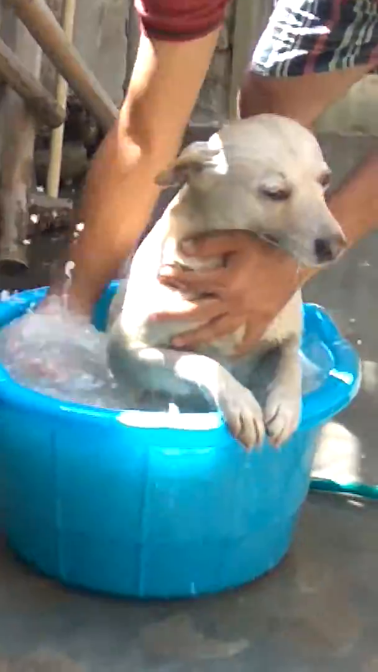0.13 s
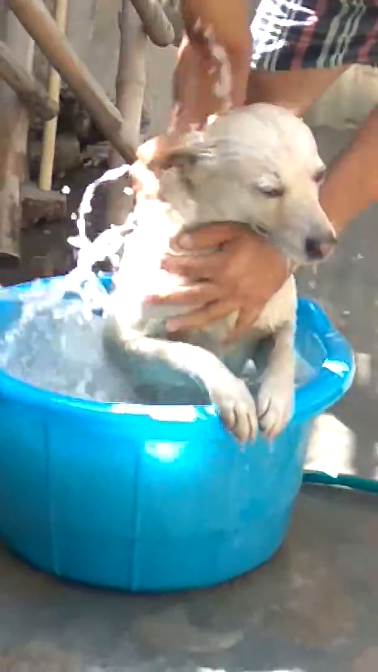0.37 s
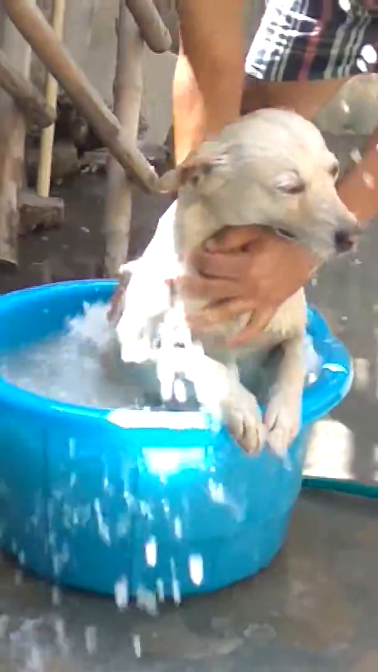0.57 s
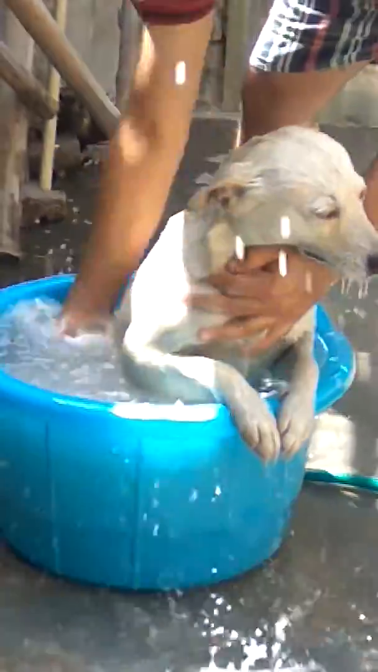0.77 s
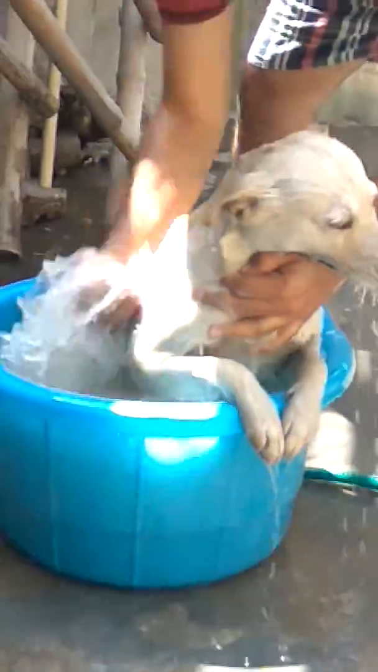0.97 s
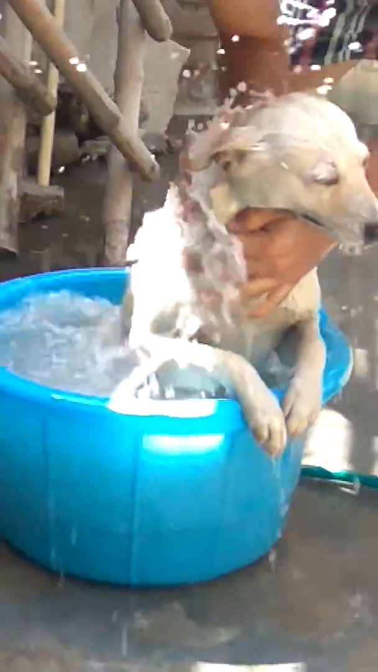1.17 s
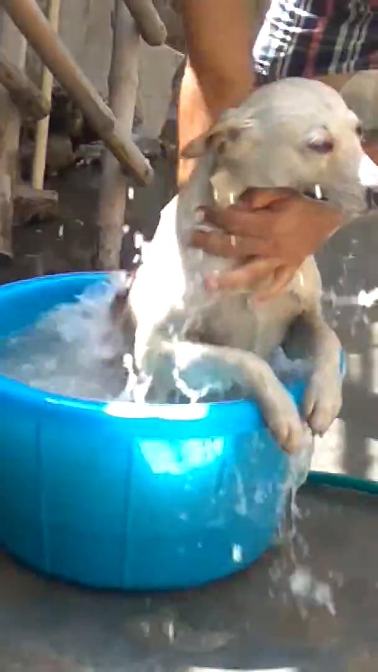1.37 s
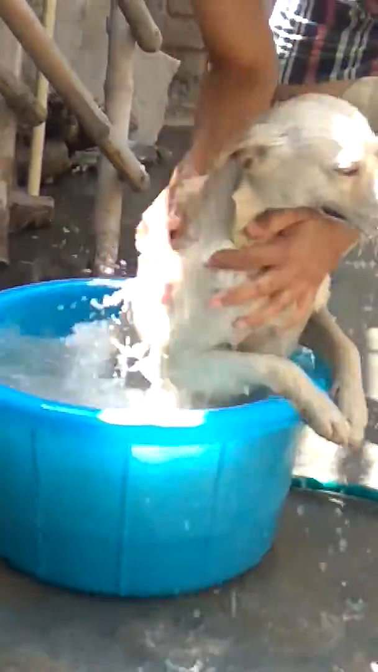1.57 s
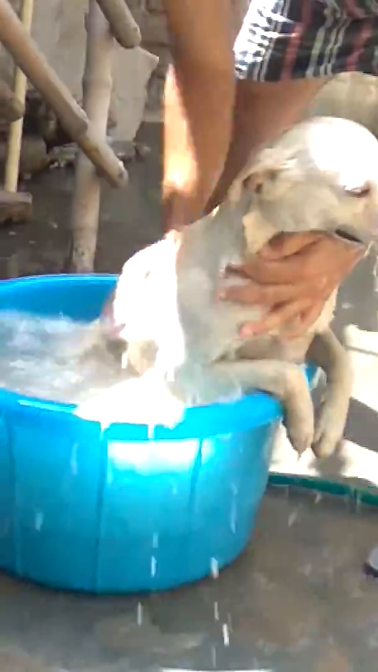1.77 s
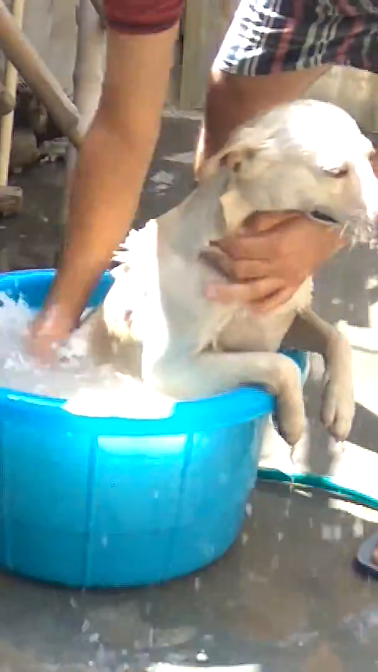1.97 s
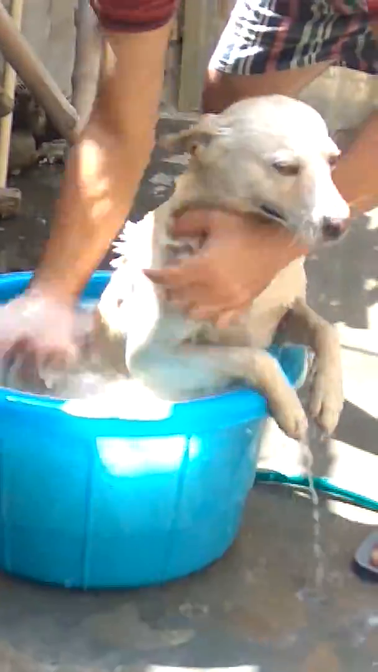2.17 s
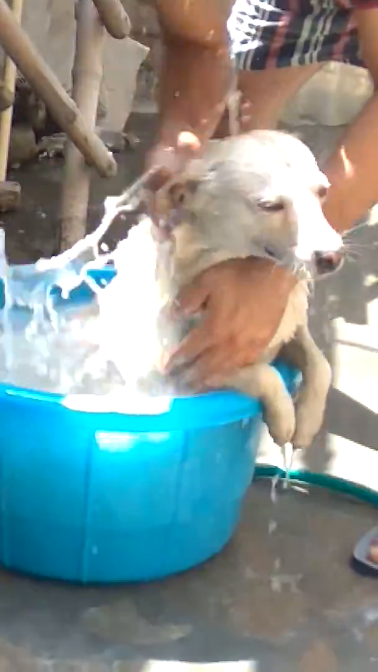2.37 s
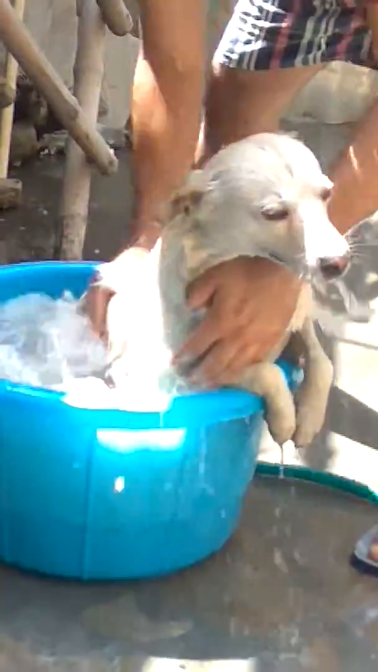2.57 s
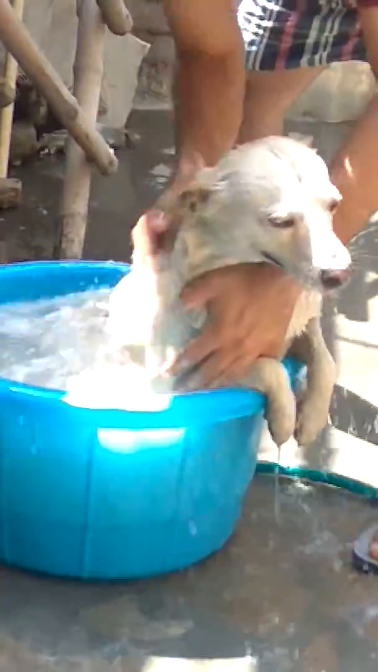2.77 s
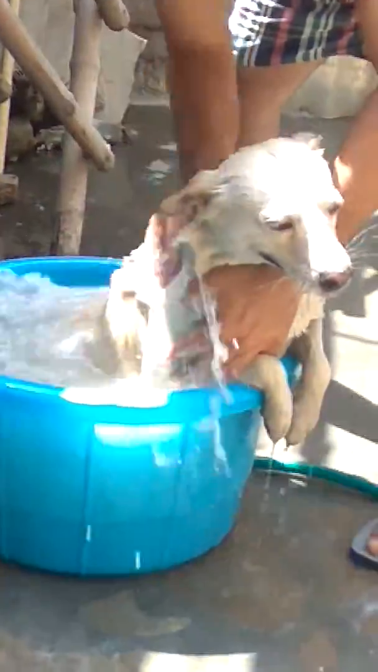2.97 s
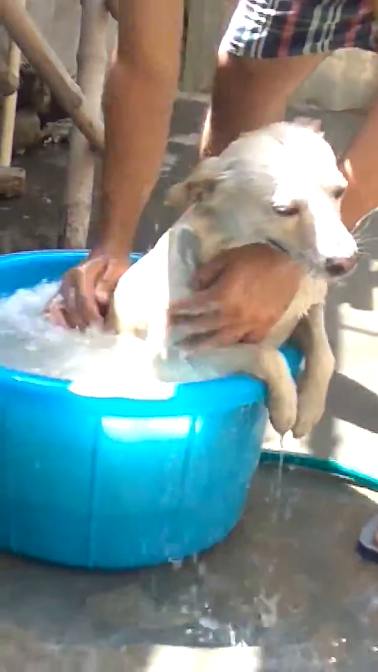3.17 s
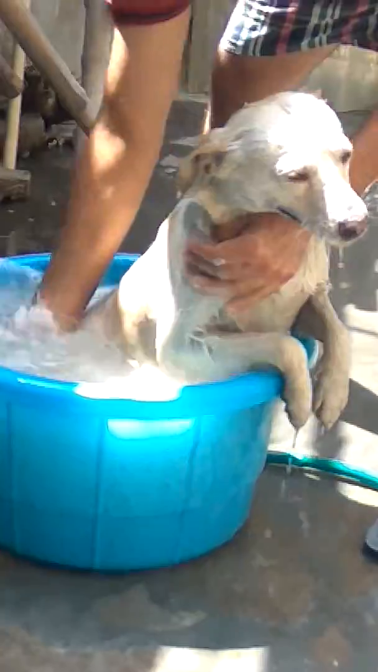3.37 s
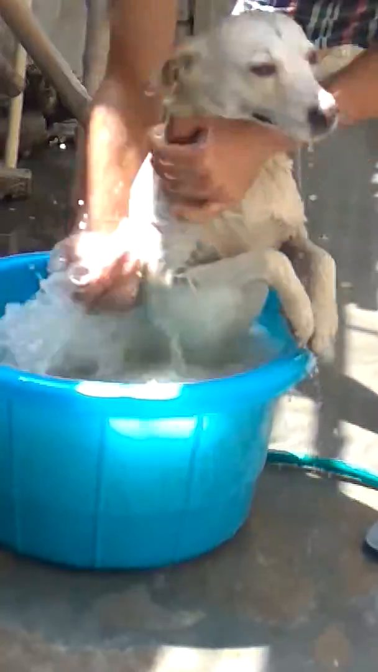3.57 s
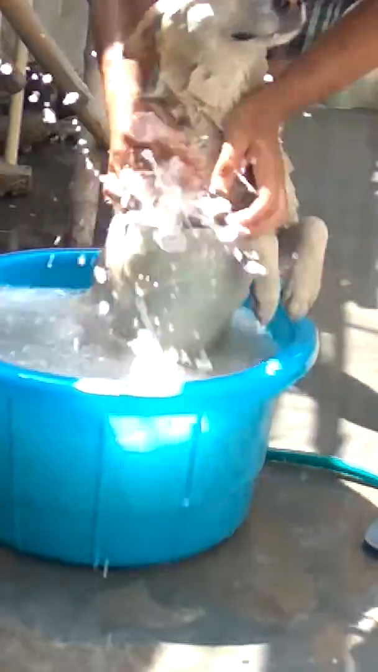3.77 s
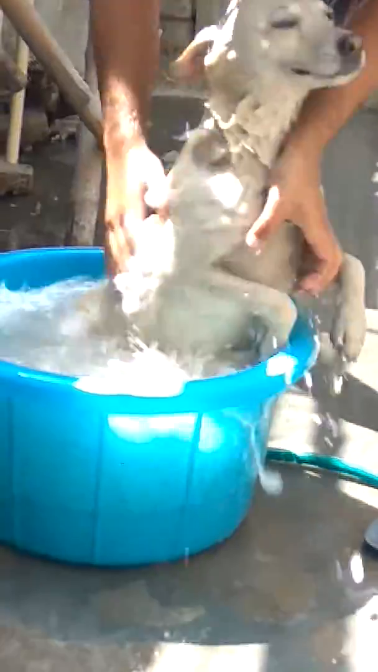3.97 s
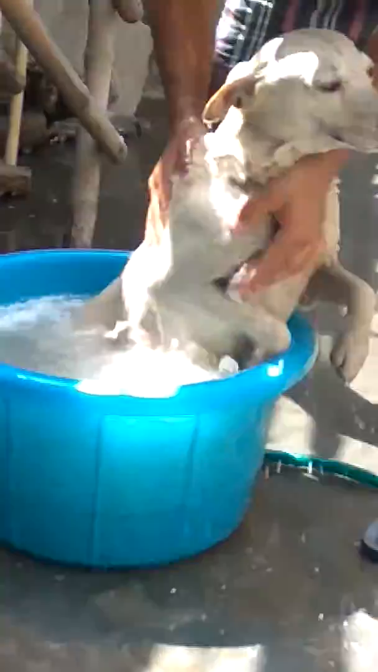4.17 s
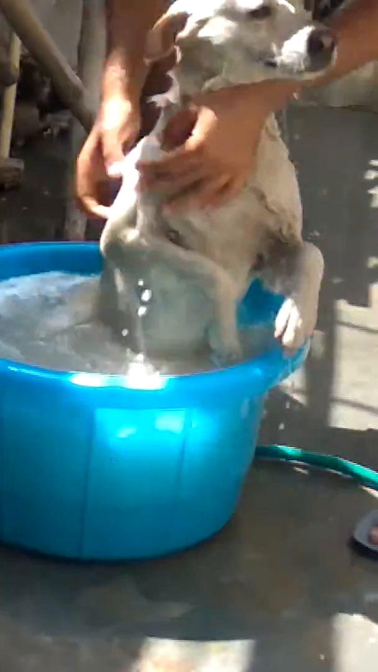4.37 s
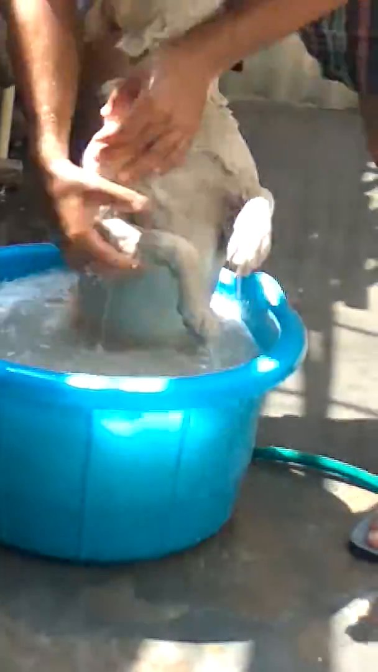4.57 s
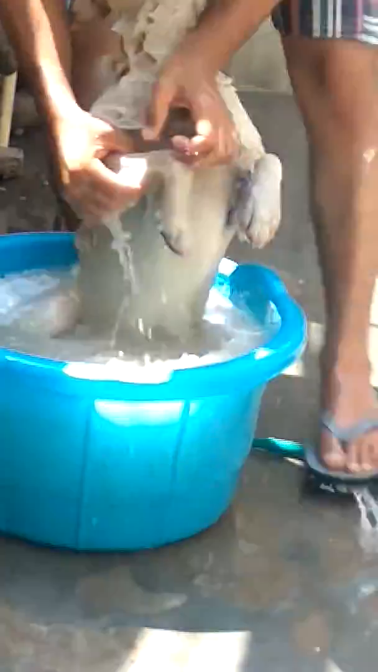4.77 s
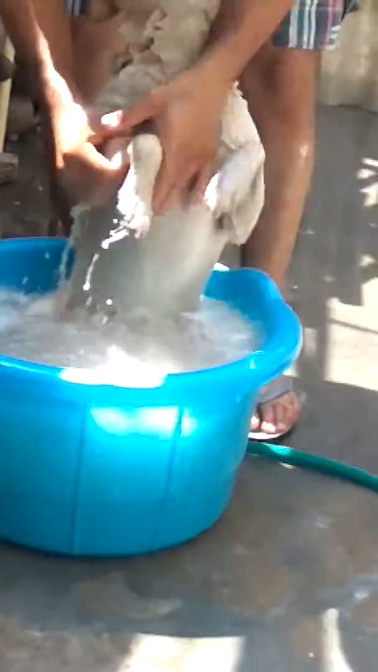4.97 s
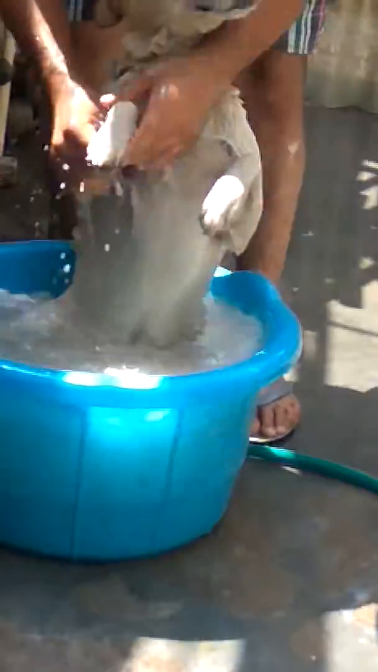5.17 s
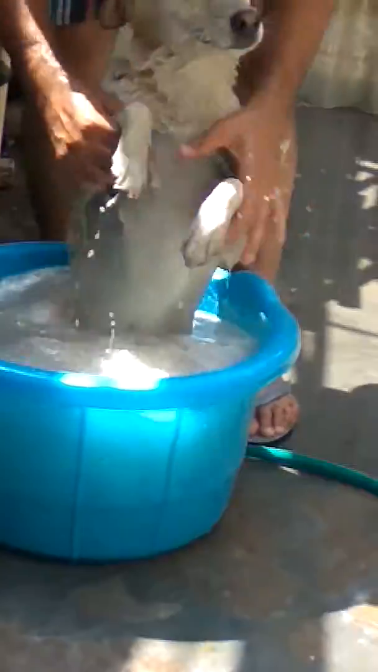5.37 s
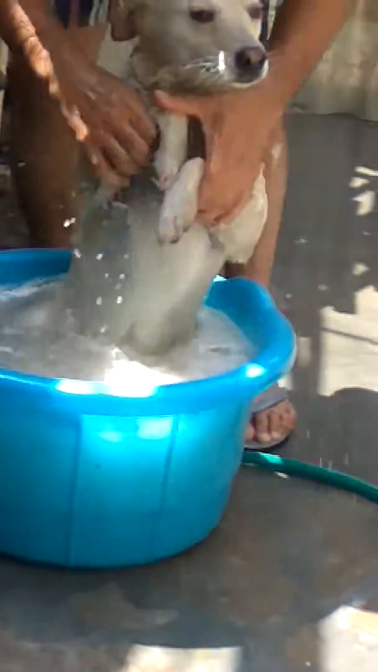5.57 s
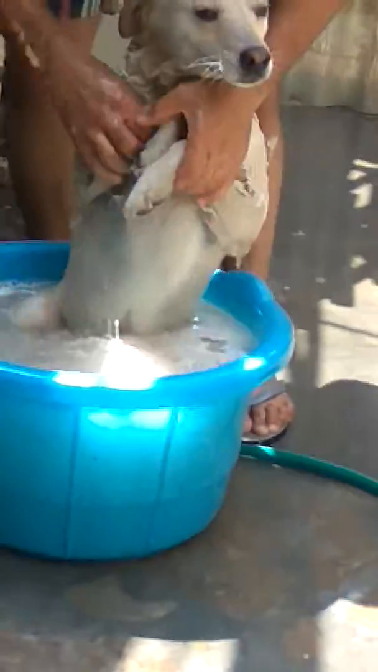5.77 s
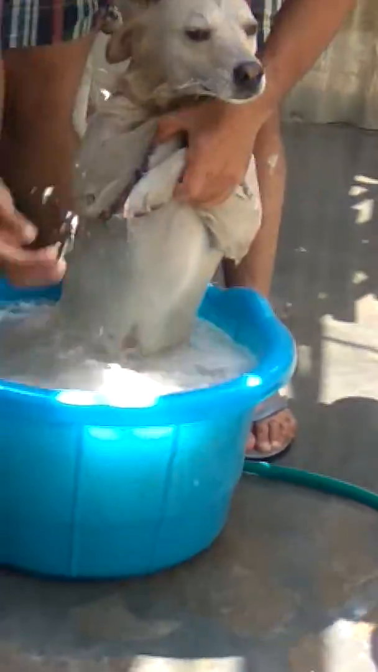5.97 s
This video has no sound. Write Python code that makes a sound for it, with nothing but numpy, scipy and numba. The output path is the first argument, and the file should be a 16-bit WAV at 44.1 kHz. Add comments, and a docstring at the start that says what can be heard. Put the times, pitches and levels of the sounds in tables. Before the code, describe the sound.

A hand briskly scoops water over a dog in a plastic tub outdoors, with gulping sloshes, slapping splashes, pattering drips, and a low tub bump near the end.

```python
"""A small walled yard, where a hand scoops water over a dog standing in a plastic tub.
Strokes and gulps are swarms of ringing bubbles; slaps, pattering sheets and runoff are clouds of tiny droplets.
Fat blobs smack as brief rings. The tub's walls drum softly in their modes and its plastic groans in bending tones;
near the end it is bumped and booms, rasping on the concrete. Far off, birds coo faintly as wavering sines.
Filtered noise makes the outdoor air, and short noise tails make the close echoes and those of the yard."""
import sys
import numpy as np
from scipy import signal
from scipy.fft import rfft, irfft
from scipy.io import wavfile
from scipy.ndimage import uniform_filter1d
from numba import njit

SR = 44100
rng = np.random.default_rng(int(sys.argv[2]) if len(sys.argv) > 2 else 0)


def int16_out(signal):
    """Quantize to a 16-bit WAV file."""
    q = np.round(np.clip(np.atleast_2d(signal).T, -1, 1) * 32767)
    wavfile.write(sys.argv[1], SR, q.astype(np.int16))


N = 265923
TIME = np.arange(N) / SR  # seconds
PORT_LAG_S = 0.00022  # typical lag by which the tub's sound reaches the right port of the microphone first
BUBBLE_ATTACK_CYCLES = 1.26  # a bubble takes this long to pinch off


def undb(db):
    """Decibels to gain."""
    return 10 ** (np.asarray(db) / 20)


def unit(x):
    """Scale to rms 1."""
    return x / np.sqrt(np.mean(x ** 2) + 1e-20)


def curves(table):
    """The columns of a control table, interpolated over time sample by sample."""
    s, *columns = np.transpose(table)
    return [np.interp(TIME, s, column) for column in columns]


def colour(x, points):
    """Filter by a spectrum of (Hz, dB) points, joined over log frequency."""
    hz, db = np.transpose(points)
    f = np.fft.rfftfreq(2 * N, 1 / SR) + 1
    gain = undb(np.interp(np.log(f), np.log(hz), db))
    return irfft(rfft(x, 2 * N) * gain)[..., :N]


def band(x, hz, q):
    """A resonance round hz, at rms 1."""
    b, a = signal.iirpeak(hz, max(q, 3 * hz / SR), fs=SR)
    return unit(signal.lfilter(b, a, x))


def sides(pan_db):
    """Left and right gains for a left minus right difference in dB."""
    return undb(np.array([[pan_db], [-pan_db]]) / 2)


def noise(width):
    """Stereo noise whose channels differ by width."""
    mid, side = rng.standard_normal((2, N))
    return np.array([mid + width * side, mid - width * side])


def wander(rate):
    """A random drift of spread 1, smoothed twice over 1 / rate seconds."""
    k = int(SR / rate)
    once = uniform_filter1d(rng.standard_normal(N), k, mode="wrap")
    return unit(uniform_filter1d(once, k, mode="wrap"))


def surges(table, rise, fade):
    """The power of each (start, length, dB) event: it builds up over the share rise of its length, holds and fades."""
    def shape(t, length):
        build = np.clip(t / max(rise * length, .002), 0, 1)
        return build * np.exp(-np.clip((t - length) / fade, 0, 20))
    return np.array([(undb(db) * shape(TIME - start, length)) ** 2 for start, length, db, *_ in table])


def flow(table, rise, fade, rest_db, rest_tone):
    """Gain and tone (last column) of surges over a resting flow; the tone is averaged by power."""
    power, rest = surges(table, rise, fade), undb(rest_db) ** 2
    total = power.sum(axis=0) + rest
    tone = (np.array(table)[:, -1] @ power + rest * rest_tone) / total
    return np.sqrt(total), tone


@njit
def rings(start, hz, t60, size, glide, attack_cycles):
    """Sines that swell for a few cycles and fade, each rising in pitch by the share glide over its life."""
    out = np.zeros(N)
    for k in range(len(start)):
        first = max(int(start[k] * SR) + 1, 0)
        last = min(int((start[k] + t60[k]) * SR), N)
        for i in range(first, last):
            t = i / SR - start[k]
            age = t / t60[k]
            onset = min(t * hz[k] / attack_cycles, 1.)
            tone = np.sin(2 * np.pi * hz[k] * t * (1 + glide[k] * age / 2))
            out[i] += size[k] * onset * np.exp(-6.9 * age) * tone
    return out


def bubbles(s, hz, t60, size, pan_db, glide, scatter_s=.00006):
    """Bubbles spread over the tub, each with its own lag between the ports; they sharpen as they near the surface."""
    lag = PORT_LAG_S * np.clip(hz / 1500, 0, 1) + scatter_s * rng.standard_normal(len(s))
    rise = glide * rng.uniform(0, 2.07, len(s))

    def port(side):
        return rings(s + side * lag / 2, hz, t60, size * undb(side * pan_db / 2), rise, BUBBLE_ATTACK_CYCLES)
    return np.array([port(1), port(-1)])


def swarm(pitch, count, cycles, spread_db, glide):
    """Countless bubbles at random moments, their levels spread exponentially; pitch(s) draws their notes."""
    s = rng.uniform(0, N / SR, count)
    hz = np.clip(pitch(s), 100, 11000)
    life = cycles * np.exp(0.21 * rng.standard_normal(count)) / hz
    size = undb(spread_db * np.minimum(rng.exponential(size=count), 3)) * hz ** .5
    return unit(bubbles(s, hz, life, size, 3 * rng.standard_normal(count), glide))


def droplets(count, cycles, spread_db):
    """The crackle of bursting droplets: short rings pitched evenly from 577 to 8150 Hz."""
    return swarm(lambda s: rng.uniform(577, 8150, len(s)), count, cycles, spread_db, glide=0.043)


def background(waver=0.0154):
    """Thin outdoor air as coloured noise, and soft calls of distant birds as sines with wavering pitch."""
    # Spectrum of the air. Each row: frequency in Hz, level in dB.
    air = [(30, -11), (60, 8.5), (300, 13.5), (430, 0.5), (600, 14.5), (800, -24), (1200, -49.5),
           (2500, -25), (10000, -18.5)]
    # Distant cooing. Each row: start in seconds, end in seconds, pitch in Hz, peak level in dB.
    coos = [(2.892, 3.15, 520, -65.5), (3.18, 3.503, 566, -58.5), (3.38, 3.677, 513.5, -51),
            (3.786, 4.013, 568, -60), (4.85, 5.226, 594, -64.5), (5.193, 5.638, 593, -64),
            (5.527, 5.706, 740, -61)]
    out = unit(colour(noise(0.58), air)) * undb(-66.0)
    for start, end, hz, db in coos:
        drift = unit(uniform_filter1d(rng.standard_normal(N), SR // 40))
        along = np.clip((TIME - start) / (end - start), 0, 1)
        swell = np.abs(np.sin(np.pi * along)) ** .5
        phase = 2 * np.pi * np.cumsum(hz * (1 + waver * drift)) / SR
        out = out + np.sin(phase) * swell * undb(db)
    return out


def yard(x, t60=0.21, wet_db=-6, first_s=0.00418):
    """Ground and close walls return a short diffuse tail: fading noise, convolved with the sound."""
    t = TIME[:SR // 2]
    tail = rng.standard_normal((2, len(t))) * undb(-60 * t / t60) * (t > first_s)
    tail /= np.sqrt(np.sum(tail ** 2, axis=1, keepdims=True))
    return x + undb(wet_db) * signal.fftconvolve(x, tail, axes=1)[:, :x.shape[1]]


def hollow(x):
    """The tub's near walls answer within milliseconds, with other resonances for every spot."""
    return yard(x, t60=0.022, wet_db=-1, first_s=0)


def walls(push):
    """The tub's walls ring in their modes, at rms 1."""
    # Wall modes. Each row: frequency in Hz, width in Hz (1 at the least is used), level in dB.
    modes = [(50.4, 1.6, -4), (77.9, 0.73, -1), (113.4, 14, 2.5), (140.6, 5, -1.5), (166.4, 4.6, -9.5),
             (296, 2.2, -15.5)]
    return unit(sum(band(push, hz, hz / max(width, 1)) * undb(db) for hz, width, db in modes))


def drumming():
    """The walls drum softly under the swaying water and swell with each press."""
    # Water and dog pressing on the walls. Each row: start in seconds, length in seconds, level in dB.
    presses = [(0, 0.32, -52.5), (.54, 0.12, -52), (.78, 0.17, -50.5), (.93, 0.15, -50), (1.17, 0.46, -55),
               (1.55, 0.39, -54), (2.1, 0.37, -53.5), (2.43, 0.13, -54.5), (2.7, 0.58, -60),
               (3.26, 0.35, -52.5), (4.55, 0.49, -53.5), (5.02, 0.16, -63), (5.28, 0.46, -55.5)]
    sway_db = -59.5  # between presses the swaying water hums on
    # rise is the share of a press spent leaning in, fade a time constant in seconds
    power = surges(presses, rise=0.45, fade=0.017).sum(axis=0) + undb(sway_db) ** 2
    return walls(noise(.1)) * np.sqrt(power)


def groans(waver=0.032):
    """Short low tones that bend as the load on the plastic changes."""
    # The plastic flexing. Each row: start in seconds, end in seconds, first pitch in Hz, last pitch in Hz,
    # peak level in dB.
    flexes = [(1.572, 1.748, 170, 135.5, -43.5), (1.747, 1.839, 100, 120, -46.5),
              (4.385, 4.527, 72, 68, -55), (4.927, 5.302, 69.9, 66.5, -50), (5.664, 5.754, 147.3, 117, -36),
              (5.725, 5.873, 133.8, 135.6, -37.5), (5.834, 5.957, 104.6, 120, -44),
              (5.872, 5.978, 160, 177, -39.5), (5.926, 6.024, 131.4, 143.4, -42)]
    out, drift = 0, 1 + waver * wander(29)
    for start, end, first_hz, last_hz, db in flexes:
        along = np.clip((TIME - start) / (end - start), 0, 1)
        hz = first_hz * (last_hz / first_hz) ** along * drift
        out = out + np.sin(2 * np.pi * np.cumsum(hz) / SR) * np.sin(np.pi * along) * undb(db)
    return out


def thud(waver=0.0206):
    """The tub is knocked, its rim rings, and it booms and rasps as it drags on the concrete."""
    # The tub shifting on the concrete. Each row: time in seconds, level of the boom in dB.
    drag = [(5.655, -52), (5.69, -38), (5.76, -40.5), (5.92, -40), (5.97, -48), (6.03, -48)]
    # Knocks on the tub. Each row: start in seconds, level in dB, pitch in Hz, fade time constant in seconds.
    hits = [(5.657, -43.5, 420, 0.073), (5.864, -53.5, 795, 0.088), (5.939, -58.5, 980, 0.039)]
    # Rim modes rung by each knock. Each row: frequency in Hz, dB above the knock, 60 dB decay time in seconds.
    rim_modes = [(269, -1, 0.38), (315, 4.5, 0.21), (365, 5, 0.15), (462, -6, 0.28), (572.5, -1.5, 0.24),
                 (766, -6, 0.15), (860, -5, 0.12)]
    boom_hz = 47.6  # lowest mode of the full tub
    rasp_db = -4.5  # rough part of the drag, relative to the boom
    rasp_colour = [(30, 7), (47, 5.5), (70, 1.0), (110, 6.5), (140, 7.5), (300, 8.0), (900, 1.5), (2000, -8.0)]
    dull_colour = [(100, -7), (300, 7.0), (800, 10.0), (1300, -2.0), (2300, -3.5), (4000, -19), (9000, -23)]

    db, = curves(drag)
    boom = unit(np.sin(2 * np.pi * np.cumsum(boom_hz * (1 + waver * wander(16))) / SR))
    rasp = unit(colour(walls(noise(0.098)), rasp_colour))
    dragging = (boom + undb(rasp_db) * rasp) * undb(db) * (TIME > drag[0][0])

    dull = colour(noise(0.81), dull_colour)
    hz, rim_db, t60 = np.transpose(rim_modes)
    knocks, rim = 0, 0
    for s, knock_db, knock_hz, fade in hits:
        knocks = knocks + burst(dull, s, 0.0052, fade, knock_hz, q=1.0) * undb(knock_db)
        starts = s + rng.uniform(0, 0.0135, len(hz))
        rim = rim + rings(starts, hz.copy(), t60.copy(), undb(knock_db + rim_db), 0 * hz, 0.39)
    return dragging + knocks + rim


def spray():
    """Droplets tick on water and coat, and many trap a small ringing bubble; their echo shifts as hand and dog move."""
    # Showers of spray and runoff. Each row: start in seconds, length in seconds, level in dB before the treble tilt,
    # fineness as treble over bass in dB.
    showers = [(-.02, 0.026, -37.5, 4), (.1, 0.1, -54.5, 0), (.255, 0.13, -48, -2.5),
               (.43, 0.12, -47.5, 6.5), (.6, 0.077, -57.5, 14), (.73, 0.039, -42, 14),
               (1.035, 0.14, -53, -3.5), (1.18, 0.083, -45, -2.5), (1.32, 0.11, -52.5, 1.5),
               (1.46, 0.21, -47, 6), (1.78, 0.089, -57.5, -2), (1.99, 0.096, -55.5, -8),
               (2.12, 0.13, -68.5, 29), (2.3, 0.35, -53, 6.5), (2.54, 0.18, -53, -1),
               (2.82, 0.02, -51.5, 31), (3.115, 0.034, -62.5, 8), (3.24, 0.12, -58, 9.5),
               (3.38, 0.11, -65.5, -12), (3.6, 0.098, -53.5, 0.5), (3.66, 0.28, -48.5, 11),
               (4.026, 0.13, -43, 13.5), (4.23, 0.12, -54, 12), (4.44, 0.35, -60, 8),
               (4.87, 0.21, -60.5, 19), (5.25, 0.13, -62.5, -0.5), (5.49, 0.019, -55, 5),
               (5.68, 0.14, -69, -7)]
    # Spectrum of the spray. Each row: frequency in Hz, level in dB.
    spectrum = [(300, -29.5), (520, -3.5), (800, -17), (1400, 4), (1900, 3.5), (2500, 10), (3500, 0.5),
                (5000, -1.5), (6500, -1.5), (10000, -2.5)]
    # drops thicken over a share of each shower and stragglers follow; the wet coat drips all the time
    gain, mist_db = flow(showers, rise=0.097, fade=0.037, rest_db=-77.5, rest_tone=11)

    def plink_hz(s):
        return 2600 * 2 ** (.7 * rng.standard_normal(len(s)))

    def fizz_hz(s):
        return rng.uniform(3200, 7200, len(s))
    ticks = droplets(count=30000, cycles=9.1, spread_db=0.0)
    plinks = swarm(plink_hz, count=4200, cycles=70, spread_db=2.2, glide=.08)
    fizz = swarm(fizz_hz, count=2000, cycles=130, spread_db=2.5, glide=.03)
    water = colour(ticks + undb(2) * plinks + undb(-1) * fizz, spectrum)

    shift = np.clip(.5 + wander(4.8), 0, 1)  # drifts between two spots in the tub
    echoed = shift * hollow(water) + (1 - shift) * hollow(water)
    water = unit(echoed * undb(2.2 * wander(74)))  # drops arrive in clusters
    coarse = signal.sosfiltfilt(signal.butter(2, 3500, fs=SR, output="sos"), water)
    fine = water - coarse
    return (coarse * undb(-mist_db / 2) + fine * undb(mist_db / 2)) * gain


def burst(water, s, rise, fade, hz, q):
    """A burst of texture through a resonance and a far broader one, swelling quickly and then dying away."""
    first, rise, fade = int(max(s, 0) * SR), max(rise, .0003), max(fade, .002)
    t = TIME[:min(SR // 4, N - first)]
    stop = first + len(t)
    shape = np.minimum(t / rise, 1) * np.exp(-np.maximum(t - rise, 0) / fade)
    texture = band(hollow(water[:, first:stop]), hz, q)
    out = np.zeros((2, N))
    out[:, first:stop] = band(texture, hz, q * 0.059) * shape
    return out


def splashes():
    """Thrown water as bursts of droplet crackle: compact handfuls slap; spread-out sheets patter."""
    # Handfuls landing. Each row: start in seconds, level in dB before a common trim, pitch in Hz,
    # left minus right in dB, fade time constant in seconds.
    handfuls = [(0.0542, -33.5, 1680, -5.5, 0.028), (0.121, -29, 2800, -1, 0.013),
                (0.385, -38, 4500, 6.5, 0.016), (0.598, -35.5, 1900, -3, 0.012),
                (0.685, -40, 5200, -6, 0.013), (0.8229, -24.5, 3100, -1, 0.015),
                (.953, -36.5, 5600, 4, 0.0034), (1.097, -35.5, 3570, 5, 0.013),
                (1.702, -32.5, 2420, 0, 0.0044), (2.036, -36.5, 2420, 2, 0.016),
                (2.469, -34.5, 2250, 4, 0.011), (2.601, -37, 2300, -5, 0.023),
                (2.8116, -41, 6260, 1, 0.025), (2.864, -35, 5500, 3, 0.0096),
                (3.469, -28, 1530, -5.5, 0.0073), (3.48, -30, 2900, 4, 0.0098),
                (3.812, -36, 1580, -3, 0.026), (3.87, -39.5, 3800, 5, 0.035),
                (4.109, -37, 3010, -8, 0.0097), (4.265, -40.5, 5900, -2, .02), (4.67, -39, 4100, 1, 0.0094),
                (4.8863, -40, 5140, 0.5, 0.013), (5.49, -43.5, 1740, 7, 0.022),
                (5.66, -48.5, 1890, 0.5, 0.029)]
    # Sheets pattering down. Each row: start in seconds, rise in seconds, fade time constant in seconds,
    # level in dB, pitch in Hz.
    falling = [(0.704, 0.014, 0.022, -35, 4200), (1.027, 0.027, 0.11, -42.5, 1760),
               (1.33, 0.0091, 0.015, -48, 6040), (1.419, 0.012, 0.0087, -48, 5200),
               (1.481, 0.024, 0.049, -42.5, 3030), (1.91, 0.014, 0.023, -41.5, 2440),
               (2.275, 0.037, 0.052, -45.5, 2240), (2.694, 0.03, 0.015, -33.5, 2550),
               (3.182, 0.036, 0.028, -44, 2780), (4.115, 0.034, 0.036, -40, 2430),
               (5.016, 0.026, 0.03, -46.5, 4600), (5.26, 0.091, 0.035, -60, 3620)]
    slap_width_hz, slap_trim_db = 1570, -4.0  # width of the narrower resonance of every slap
    colouring = [(200, -16.5), (700, 2.5), (1500, -0.5), (4000, -4.0), (10000, -4.5)]  # (Hz, dB)
    dense = colour(droplets(count=70000, cycles=5.2, spread_db=-1.0), colouring)
    loose = colour(droplets(count=50000, cycles=7.8, spread_db=-4.5), colouring)
    out = np.zeros((2, N))
    for s, db, hz, pan_db, fade in handfuls:
        slap = burst(dense, s, 0.0043, fade, hz, hz / slap_width_hz)
        out += slap * undb(db + slap_trim_db) * sides(pan_db)
    for s, rise, fade, db, hz in falling:
        out += burst(loose, s, rise, fade, hz, q=1.0) * undb(db)
    return out


def smacks():
    """A fat blob lands flat on the concrete or the coat: a sharp crack that rings for a few cycles."""
    # Blobs landing. Each row: start in seconds, level in dB, pitch in Hz.
    blobs = [(0.109, -35, 3270), (0.1247, -27, 2580), (0.6031, -26, 1810), (0.8253, -14.5, 2510),
             (0.842, -32, 2550), (1.6679, -27, 1370), (1.843, -28, 1460), (2.142, -40.5, 3570),
             (2.8429, -28.5, 2700), (3.7968, -32, 4540), (3.8956, -24, 1140), (4.021, -26.5, 2290),
             (4.173, -28, 2380), (5.4905, -35.5, 1800)]
    # Partials of a smack. Each row: multiple of its pitch, dB relative to the smack.
    partials = [(0.73, -11), (0.999, -0.5), (1.46, -13.5), (2.2, -15)]
    s, db, hz = np.transpose(blobs).copy()
    t60 = np.full(len(s), 0.0073)  # seconds
    return sum(rings(s, hz * multiple, t60, undb(db + partial_db), 0 * hz, BUBBLE_ATTACK_CYCLES)
               for multiple, partial_db in partials)


def pockets(table, glide):
    """Single bubbles loud enough to stand out."""
    s, db, hz, pan_db, t60 = np.array(table, float).T.copy()
    return bubbles(s, hz, np.maximum(t60, .005), undb(db), pan_db, glide)


def gulps(count=20, scatter=0.0906, t60=0.028, swell_db=5, uneven_db=3):
    """A quick chain of bubbles that swells in the middle; its pitch follows the size of the hollow."""
    # The cupped hand opening and closing a hollow. Each row: start in seconds, end in seconds, first pitch in Hz,
    # last pitch in Hz, rms level over that span in dB.
    cups = [(0.252, 0.306, 1460, 1380, -53), (0.485, 0.532, 890, 1400, -48.5),
            (1.061, 1.146, 565, 755, -44), (1.615, 1.668, 2350, 3050, -52.5),
            (2.044, 2.15, 2880, 2550, -53.5), (2.05, 2.129, 1260, 1520, -56), (2.082, 2.139, 700, 468, -47),
            (2.126, 2.221, 308, 446, -45), (2.146, 2.21, 580, 906, -45.5), (2.149, 2.217, 896, 1580, -48.5),
            (2.207, 2.262, 1460, 1700, -63), (2.318, 2.375, 1360, 656, -50), (2.375, 2.41, 3150, 3640, -50),
            (2.565, 2.63, 1390, 1600, -53), (2.802, 2.846, 1170, 625, -51.5),
            (2.809, 2.849, 490, 303, -50.5), (2.857, 2.922, 3400, 4070, -54.5),
            (3.359, 3.48, 878, 1080, -52.5), (3.43, 3.48, 1300, 1640, -55), (3.49, 3.616, 550, 504, -58),
            (3.635, 3.721, 1230, 2750, -49.5), (3.723, 3.805, 830, 830, -55),
            (4.094, 4.147, 428, 724, -45.5), (4.103, 4.179, 1430, 1910, -55)]
    out = 0
    for start, end, first_hz, last_hz, db in cups:
        along = (np.arange(count) + rng.uniform(0, 1, count)) / count
        hz = first_hz * (last_hz / first_hz) ** along * 2 ** (scatter * rng.standard_normal(count))
        size = undb(swell_db * np.sin(np.pi * along) + uneven_db * rng.standard_normal(count))
        chain = bubbles(start + along * (end - start), hz, np.full(count, t60), size, 0, 0.13)
        # rms 1 over the whole length becomes rms 1 over the span
        out = out + unit(chain) * np.sqrt(abs(end - start) * SR / N) * undb(db)
    return out


def churn():
    """The hand drags air under: big bubbles round each stroke's pitch, coloured by the hollow of the tub."""
    # Strokes of the hand through the water. Each row: start in seconds, length in seconds, level in dB,
    # bubble pitch in Hz.
    strokes = [(-.03, 0.1, -45.5, 800), (.1, 0.021, -44.5, 709), (.255, 0.14, -45, 825),
               (.46, 0.036, -44.5, 880), (.68, 0.092, -51, 972), (0.92, 0.09, -57.5, 258.4),
               (1.04, 0.095, -44, 702), (1.18, 0.12, -45.5, 734), (1.42, 0.19, -57, 781),
               (1.82, 0.16, -53.5, 634), (2.03, .17, -51, 765), (2.275, 0.075, -48, 1060),
               (2.39, 0.24, -50, 849), (2.7, 0.048, -54.5, 1188), (2.8, 0.028, -54, 586),
               (3.13, 0.1, -63, 1130), (3.42, 0.097, -47.5, 700), (3.62, 0.36, -51, 1180),
               (4.06, 0.069, -53, 682), (4.32, 0.12, -62, 582), (4.58, 0.11, -60, 1176),
               (4.88, 0.1, -62.5, 1136)]
    # Spectrum of the churning. Each row: frequency in Hz, level in dB.
    spectrum = [(150, -25), (300, 5), (550, -3), (750, 2.5), (950, -3), (1350, 5.5), (1900, 2.5),
                (3500, -17), (9000, -18)]
    # bubbles build up over a share of a stroke and clear slowly; the water never quite comes to rest
    gain, hz = flow(strokes, rise=0.18, fade=0.0597, rest_db=-68.5, rest_tone=470)

    def pitch(s):
        return np.interp(s, TIME, hz) * 2 ** (0.6033 * rng.standard_normal(len(s)))
    water = swarm(pitch, count=4000, cycles=34.6, spread_db=3.0, glide=0.19)
    return unit(colour(water, spectrum)) * gain


def scene():
    """The background, the drumming, groaning and thudding tub, and the water echoing in the yard."""
    # Large air pockets closing. Each row: start in seconds, level in dB, pitch in Hz, left minus right in dB,
    # 60 dB decay time in seconds.
    plops = [(.001, -29.5, 750, -1, 0.053), (.351, -23.5, 734, -0.5, 0.094), (.351, -33, 1305, -2, 0.02),
             (.384, -33.5, 681.5, -5, 0.095), (.387, -33.5, 370, 3, 0.039), (.477, -35.5, 751, -1, 0.12),
             (.504, -31.5, 1235, 8, 0.03), (1.072, -28.5, 679.4, -3, 0.11), (1.136, -41, 738, 4, 0.055),
             (1.172, -35, 740, -1, 0.051), (1.254, -43, 493, 9, 0.15), (1.335, -43.5, 800, 6, 0.08),
             (2.041, -34.5, 740, 0, 0.07), (2.079, -30.5, 692, -2, 0.044), (2.15, -30.5, 690, -5, 0.036),
             (2.169, -30.5, 862, -7, 0.029), (2.199, -38, 1540, 11.5, 0.062), (2.32, -32, 1153, 4, 0.031),
             (2.562, -34, 650, -1, 0.059), (2.809, -30, 710, 1, 0.022), (3.35, -26.5, 895, 1, 0.025),
             (3.365, -32.5, 915, -3, 0.046), (3.474, -25.5, 584, 6, 0.024), (3.77, -41.5, 744, -3, 0.1),
             (4.0605, -27.5, 1584, -1, 0.026), (4.07, -35, 1260, 1, 0.032), (4.41, -41, 980, 2, 0.022),
             (4.891, -46, 1360, -10, 0.032), (4.946, -53.5, 802, 5, 0.14), (5.868, -48.5, 830, 1, 0.049),
             (5.943, -43.5, 970, 0, 0.032)]
    # Single drips ringing in the water. Each row: start in seconds, level in dB, pitch in Hz, left minus right in dB.
    drips = [(0.443, -37.5, 3580, -1.5), (.525, -30, 6700, 2), (.603, -30, 1740, 3),
             (.604, -35.5, 2040, 18), (1.202, -43, 5500, 14), (1.702, -36, 2354, 12),
             (1.843, -37.5, 2250, 2.5), (2.04, -37, 3000, 5), (2.475, -31.5, 2140, -7),
             (2.562, -33.5, 3330, 2), (2.64, -34.5, 2420, 3), (3.492, -27.5, 2900, 1.5),
             (3.872, -33, 3610, -6), (4.368, -38, 2320, -5), (4.696, -33, 3000, 0), (4.835, -38, 3380, 4),
             (5.225, -44, 2730, 0)]
    drip_t60_s = 0.019
    ringing_drips = [(*drip, drip_t60_s) for drip in drips]
    single = pockets(plops, glide=0.14) + pockets(ringing_drips, glide=0.18) + smacks()
    single = yard(single, t60=0.11, wet_db=-5, first_s=0.006)  # lone bubbles and smacks get a short, close echo
    water = churn() + gulps() + spray() + splashes() + single
    return background() + drumming() + groans() + thud() + yard(water)


def record(dry):
    """Each port has its own colour; both have little deep bass, a deep notch near 8.2 kHz and a cut at the top."""
    # Difference between the ports. Each row: frequency in Hz, left minus right in dB.
    balance = [(100, 1), (280, 2.5), (600, -1), (1200, 1.5), (2300, 4), (4500, -1.5), (8000, -5.5)]
    # Overall frequency response: little deep bass, a deep notch near 8.2 kHz, a partial return near 9 kHz.
    # Each row: frequency in Hz, gain in dB.
    response = [(22, -27.5), (42, -3.5), (6200, 2.5), (7000, -5), (7600, -13), (8200, -35.5), (8600, -11),
                (9100, -7.5), (9800, -19.5)]
    top_hz = 9950  # a steep cut above this
    left, right = [colour(x, [(hz, side * db / 2) for hz, db in balance]) for x, side in zip(dry, (1, -1))]
    heard = colour(np.array([left, right]), response)
    return signal.sosfilt(signal.ellip(8, .2, 70, top_hz, fs=SR, output="sos"), heard)


dry = scene()
out = record(dry)
int16_out(out)
```